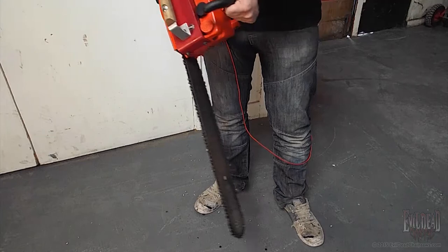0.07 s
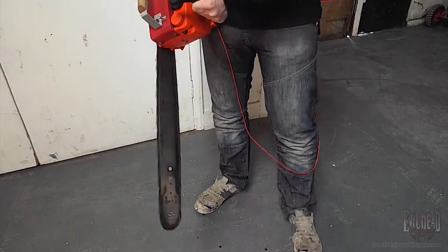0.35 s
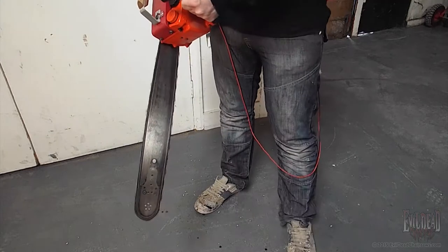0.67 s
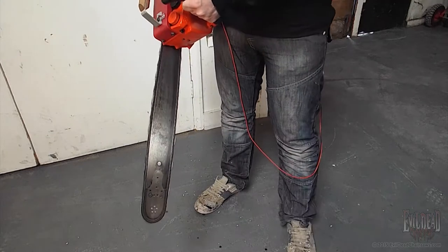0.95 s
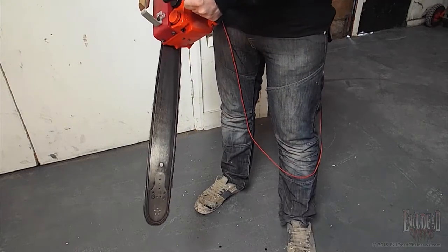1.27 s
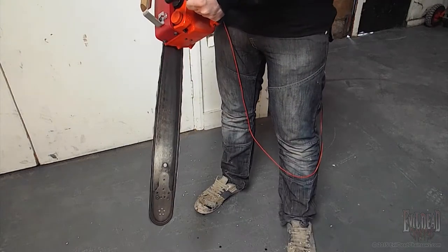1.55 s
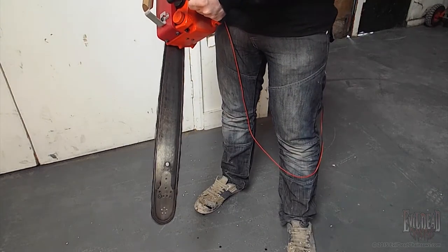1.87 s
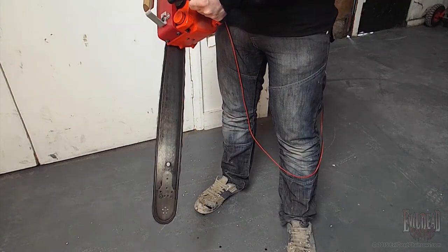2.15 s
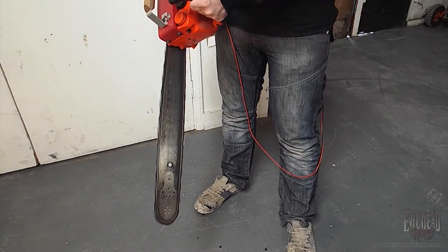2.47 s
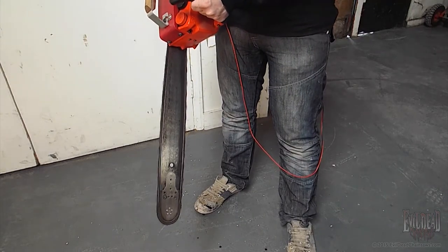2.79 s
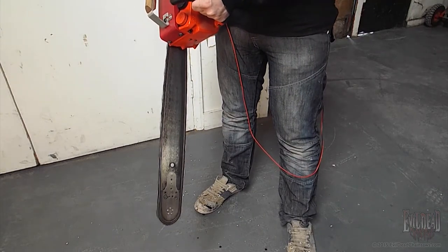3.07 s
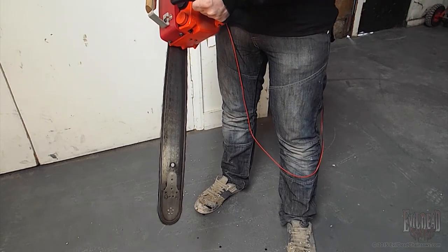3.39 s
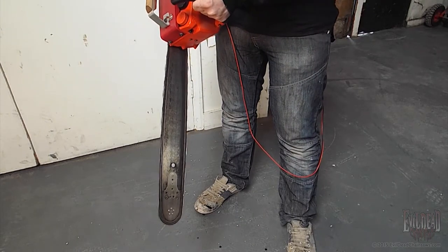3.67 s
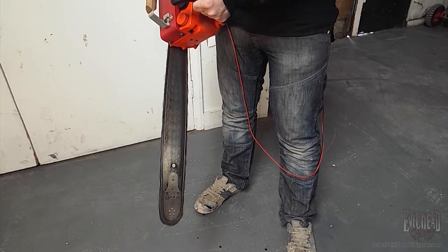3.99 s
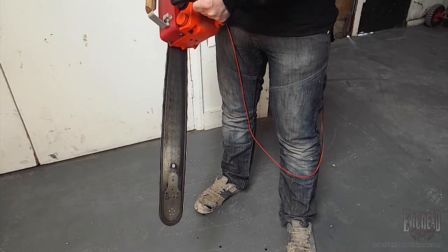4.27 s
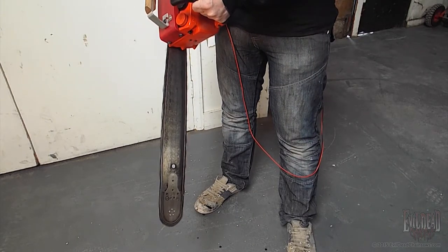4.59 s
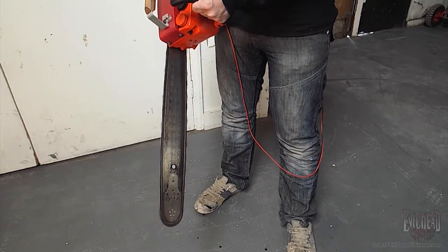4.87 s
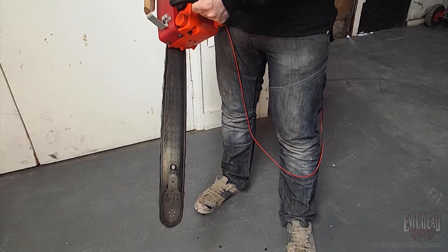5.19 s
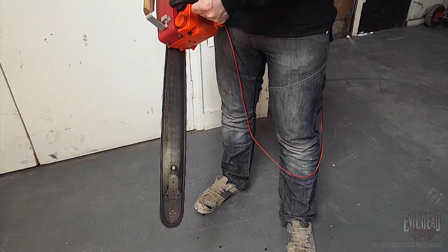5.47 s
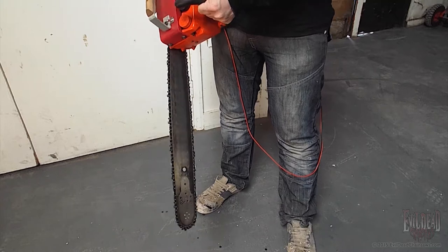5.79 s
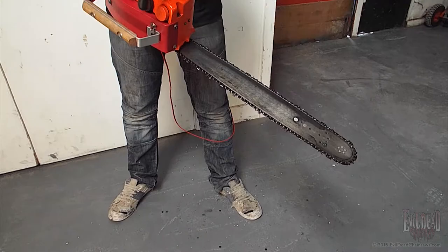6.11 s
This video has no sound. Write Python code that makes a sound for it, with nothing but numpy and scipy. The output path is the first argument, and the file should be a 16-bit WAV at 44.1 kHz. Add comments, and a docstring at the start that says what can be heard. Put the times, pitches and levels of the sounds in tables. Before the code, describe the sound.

A faint workshop hiss with a low-level hum opens the sound. At about 0.2 seconds an electric chainsaw switches on with a sharp slap of steel and reaches full speed almost at once. Its slack chain runs freely, cutting nothing, in a steady, growling rattle that throbs rapidly. Links knock inside the hollow plastic housing and tick and jingle brightly along the steel bar. Harder metallic slaps come irregularly, the strongest near 3.5, 4.6 and 5.3 seconds, and the housing sometimes rings out with a brief hollow tone. At about 5.6 seconds the power cuts and the chain coasts quickly to rest, settling with a dull shake around 5.8 seconds. Just after 6 seconds the saw is moved, giving a faint rustle and a thin, high squeak. The saw is close, with a short reverb from the floor and walls.

```python
"""In a quiet workshop an electric chainsaw is switched on with a slap of steel and spins up.
For five seconds its slack chain runs free: links knock in the hollow plastic housing and tick along
the steel bar, in a rattle that throbs 17 times a second and growls at the drive sprocket's six teeth.
Now and then a link slaps the bar hard, or the housing sings out. Then the chain coasts to rest
and settles, and at the end the saw is moved, with a rustle and a thin squeak."""
import sys
import numpy as np
from scipy import signal
from scipy.fft import rfft, irfft, next_fast_len
from scipy.io import wavfile
from scipy.ndimage import uniform_filter1d

SR = 44100
rng = np.random.default_rng(int(sys.argv[2]) if len(sys.argv) > 2 else 0)


def dump(signal):
    """Clip the signal to [-1, 1] and save it as 16-bit WAV at the path in sys.argv[1]."""
    limited = np.clip(np.atleast_2d(signal).T, -1, 1)
    pcm = np.round(limited * 32767).astype(np.int16)
    wavfile.write(sys.argv[1], SR, pcm)


N = 270774
T = np.arange(N) / SR
ON_S, OFF_S = 0.23, 5.554  # trigger pressed and released


def saw():
    """The main voice: running chain, slaps and shakes ring the plastic housing and the steel bar."""
    knocks, ticks = chain()
    shake_knocks, shake_ticks = shakes()
    return housing(knocks + shake_knocks) + bar(ticks + shake_ticks + slaps())


def chain(throb_hz=16.97, warming_hz_per_s=0.1, tightest_s=0.521, loosen_s=0.4):
    """Knocks for the housing, ticks for the bar; tension swings once a turn and jerks at every tooth."""
    speed = motor()
    turns = np.cumsum(speed * (throb_hz + warming_hz_per_s * T)) / SR  # a warm motor runs faster
    tension = np.cos(2 * np.pi * (turns - np.interp(tightest_s, T, turns)))
    blows, grip = sprocket(turns)
    flap_db = 0.62 * wander(top_hz=50.7)  # the slack chain flaps unevenly,
    scrape_db = 0.41 * wander(top_hz=8.2)  # rides harder or softer in the groove
    churn_db = 0.45 * wander(top_hz=0.8)  # and churns slowly in the housing
    plastic = impacts(per_s=3400 * speed, spread_db=0.5) * from_db(-30.5 + grip)
    knocks = (plastic + from_db(-39.5) * blows) * from_db(flap_db + churn_db + 0.5 * tension)
    steel = impacts(per_s=15000 * speed, spread_db=3.5) + jingle(speed)
    tight_db = -np.exp(-np.maximum(T - ON_S, 0) / loosen_s)  # quieter until the chain works loose
    ticks = steel * from_db(-30 + tight_db + flap_db + scrape_db + 1.03 * tension + 2 * grip)
    return knocks * speed ** 0.39, soften(ticks, speed) * speed ** 0.44  # faster links strike harder


def motor(spin_up_s=0.051, coast_s=0.108, friction=0.06):
    """Speed from 0 to 1: a quick spin-up, a steady run, and a coast until dry friction stops the chain."""
    spin_up = 1 - np.exp(-np.maximum(T - ON_S, 0) / spin_up_s)
    coast = (1 + friction) * np.exp(-np.maximum(T - OFF_S, 0) / coast_s) - friction
    return spin_up * np.maximum(coast, 0)


def sprocket(turns, teeth=6, slack_links=0.035, uneven_db=3, grip_links=0.11, bite_s=0.0012):
    """The growl: each tooth catches a slack link a little early or late, with a blow and a brief grip."""
    links = teeth * turns + slack_links * wander(top_hz=25.2) * motor()
    links_caught = np.floor(np.maximum.accumulate(links))
    catches = np.diff(links_caught, prepend=links_caught[0])
    blows = catches * from_db(uneven_db * np.clip(rng.standard_normal(N), -2, 1.5))
    grip = uniform_filter1d(np.exp(-(links % 1) / grip_links), round(bite_s * SR))
    return unit(blows) * [[1], [0]], grip  # the blows feed the mid only


def jingle(speed, band_db=-10, clump_db=2):
    """Loose links jingle in clumps, now in a lower band and now in a higher one."""
    out = np.zeros((2, N))
    for band_hz in [(4200, 6800), (6800, 10500)]:
        hits = impacts(per_s=4000 * speed, spread_db=3.5)
        clumps = from_db(clump_db * np.minimum(wander(top_hz=25.7), 2))
        bandpass = signal.butter(2, band_hz, "bandpass", fs=SR, output="sos")
        out += from_db(band_db) * unit(signal.sosfilt(bandpass, hits * clumps))
    return out


def soften(ticks, speed, corner_hz=6000):
    """Slow links meet the bar more gently: their top end fades with the speed."""
    dull = signal.lfilter(*signal.butter(1, corner_hz, fs=SR), ticks)
    return dull + (ticks - dull) * speed ** 0.36


# The housing's boxy tone curve: f/Hz, level/dB
HOUSING_CURVE = [(100, -47.5), (190, -60), (255, -33), (300, -20), (410, -17.5), (460, -8.5), (505, -1),
                 (600, -4), (700, -5), (1050, -4), (1350, -12.5), (2000, -16.5), (4000, -33.5), (9000, -75)]
# Its resonant peaks and dips: f/Hz, width/Hz, level/dB over the curve
HOUSING_RESONANCES = [(308, 16, 2), (392, 26, 3), (453, 14, 6), (496, 24, 2.5), (525, 22, 4.8),
                      (571, 16, 7.8), (627, 16, 9), (653, 14, 5.5), (690, 34, -2.5), (736, 14, 2.5),
                      (772, 26, 4.5), (815, 14, 5), (885, 22, -2.5), (934, 22, 6.8), (1042, 22, 3),
                      (1088, 14, 2.5), (1131, 18, 3.5), (1260, 36, -3), (1334, 36, 4), (1400, 60, -3.5)]
# Swells of a single resonance: t/s, length/s, f/Hz, boost/dB
HOUSING_SWELLS = [(0.75, 0.75, 1040, 4.5), (2.72, 0.32, 930, 6), (2.93, 0.24, 620, 5.5),
                  (3.8, 0.51, 620, 2), (3.85, 2.2, 945, 3), (5.132, 0.62, 579, 5)]


def housing(knocks, width_hz=20):
    """The body of the sound: hollow plastic rings, and now and then one resonance sings out."""
    out = convolve(knocks, ring(HOUSING_CURVE, HOUSING_RESONANCES))
    for start, length, hz, boost_db in HOUSING_SWELLS:
        resonance = signal.lfilter(*signal.iirpeak(hz, hz / width_hz, fs=SR), out)
        out = out + (from_db(boost_db) - 1) * burst(start, length) * resonance
    return out


# The bar's bright tone curve: f/Hz, level/dB
BAR_CURVE = [(300, -46), (800, -17.5), (1500, -2.5), (2200, -0.5), (2800, -0.5), (3400, 2), (4200, -1),
             (5200, 0.5), (7000, 0.5), (8300, 1.5), (9500, -2), (11500, -7), (13000, -12.5), (15800, -19.5)]
# Its metallic peaks: f/Hz, width/Hz, level/dB over the curve
BAR_RESONANCES = [(1574, 190, 8.2), (1905, 105, 5.7), (2216, 29, 3.4), (2410, 170, 5.2), (3157, 156, 5.7),
                  (4540, 170, 1.9), (5380, 110, 2.4), (5550, 200, 2.9), (6150, 150, 4.5), (7860, 100, 2),
                  (9060, 110, 3.6), (9540, 150, 2.4)]


def bar(ticks, echoes=14, echo_db=-13):
    """The bright edge: the steel bar rings, and nearby floor, wall and legs echo it within 25 ms."""
    steel = convolve(ticks, ring(BAR_CURVE, BAR_RESONANCES))
    taps = np.zeros(SR // 40)
    gains = rng.choice([-1, 1], echoes) * from_db(echo_db) / np.sqrt(echoes)
    taps[rng.integers(SR // 300, len(taps), echoes)] = gains
    return steel + convolve(steel, taps)


# Hard steel accents, the first at switch-on: t/s, level/dB into the bar, f/Hz, width/octaves, decay/s
LINK_SLAPS = [(0.2391, -18, 9800, 0.42, 0.001), (0.2487, -30, 9000, .35, .001),
              (0.820, -18.5, 5600, .4, .003), (0.932, -16, 5750, .5, .004), (1.041, -15, 5600, .45, 0.0032),
              (1.115, -19, 6000, .4, .003), (1.3515, -15, 5200, 0.49, .003),
              (1.5637, -20, 6230, 0.43, .003), (1.582, -16, 6100, 0.49, .003),
              (1.633, -16, 3900, .65, 0.0035), (1.688, -16, 7500, .45, .003),
              (1.807, -19.5, 5360, .45, 0.0041), (2.164, -15, 11000, 0.47, .003),
              (2.3403, -15, 4500, .5, .003), (2.392, -19, 5400, .45, .003), (2.5725, -16, 8200, 0.22, .003),
              (2.972, -24, 4000, 0.45, .003), (3.079, -15, 4700, .45, .003), (3.318, -22, 6400, 0.37, .004),
              (3.5358, -9, 11500, 0.55, .002), (3.5412, -15, 11000, .6, .003),
              (3.608, -12, 5000, .4, .0028), (3.710, -22, 3200, 0.49, .006), (3.723, -14, 4700, 0.36, .003),
              (3.877, -17, 7800, 0.25, .0024), (4.300, -19, 4900, .45, .005), (4.3625, -15, 5500, .4, .003),
              (4.6268, -9, 6900, .45, .0026), (4.6317, -7.8, 6200, 0.58, .0017),
              (4.928, -21, 6100, .45, .004), (4.936, -18.5, 5400, .4, .003),
              (4.988, -16, 5200, 0.36, 0.0076), (5.046, -16, 4800, .42, 0.0056),
              (5.094, -13, 3770, .45, 0.0027), (5.165, -16, 5550, .45, 0.0044),
              (5.276, -19.5, 5450, .4, .004), (5.3082, -11.5, 5700, .48, 0.0041)]


def slaps(attack_s=0.0006, size=2048):
    """A link strikes the bar and chatters for a few milliseconds, in a band set by where it lands."""
    force = np.zeros((2, N))
    hz, t = np.fft.rfftfreq(size, 1 / SR), T[:size]
    for start, db, centre_hz, octaves, decay_s in LINK_SLAPS:
        band = np.exp(-0.5 * (np.log2((hz + 1) / centre_hz) / octaves) ** 2)
        phases = np.exp(2j * np.pi * rng.random((2, len(hz))))
        chatter = irfft(phases * band) * np.sqrt(size)
        envelope = np.minimum(t / attack_s, 1) * np.exp(-t / decay_s)
        force[:, round(start * SR):][:, :size] += from_db(db) * chatter * envelope
    return force


# Closing rustles: t/s, length/s, level/dB into the housing, level/dB into the bar, bar low-pass f/Hz
SOFT_SHAKES = [(5.761, 0.02, -51, -27.5, 1700), (6.058, 0.089, -49.5, -45.5, 3600)]


def shakes():
    """The whole saw shakes as the chain settles and again as it is moved; soft contact sounds dull."""
    knocks, ticks = np.zeros((2, 2, N))
    for start, length, housing_db, bar_db, cutoff_hz in SOFT_SHAKES:
        rattle = burst(start, length) * impacts(per_s=12000, spread_db=4)
        knocks += from_db(housing_db) * rattle
        ticks += from_db(bar_db) * signal.lfilter(*signal.butter(3, cutoff_hz, fs=SR), rattle)
    return knocks, ticks


# Four hoots and the last squeak: t/s, length/s, f/Hz, level/dB, waver/share of the pitch
HOOTS_AND_SQUEAK = [(0.278, 0.024, 533, -27, 0.028), (3.042, 0.05, 620, -29, 0.022),
                    (5.491, 0.03, 575, -28.5, 0.025), (5.578, 0.024, 562, -31, 0.021),
                    (6.074, 0.076, 8390, -55, .007)]


def hoots_and_squeak():
    """The housing hoots as the chain runs and the saw squeaks when moved: brief, wavering tones."""
    out = np.zeros((2, N))
    for start, length, hz, db, waver in HOOTS_AND_SQUEAK:
        pitch_hz = hz * (1 + waver * wander(top_hz=150))
        phase = 2 * np.pi * np.cumsum(pitch_hz) / SR
        tone = unit(np.array([np.sin(phase), np.cos(phase)]))
        out += from_db(db) * burst(start, length) * tone
    return out


def workshop(direct, wet_db=-10.5, low_t60_s=0.94, high_t60_s=0.55, crossfade_hz=0.4525, tails=4):
    """Floor and wall reverb, highs dying first; several tails slowly crossfade to keep its tone even."""
    out = direct
    for k in range(tails):
        hz, t, noise = signal.stft(rng.standard_normal((2, SR // 2)), SR, nperseg=256)
        t60 = over_hz([(500, low_t60_s), (9000, high_t60_s)], hz)[:, None]
        decay = np.exp(-np.log(1000) * t / t60) * (t > 0.004)  # with a short pre-delay
        tail = signal.istft(noise * decay, SR)[1]
        crossfade = 2 * np.pi * crossfade_hz * (1 + k // 2) * T + k * np.pi / 2
        send = np.sqrt(2 / tails) * np.cos(crossfade)  # the total power stays constant
        out = out + from_db(wet_db) * convolve(direct * send, tail / np.linalg.norm(tail[0]))
    return out


# The tone curve of the quiet workshop: f/Hz, level/dB
ROOM_CURVE = [(20, -12), (60, -14.5), (110, -13.5), (170, -11), (400, -3.5), (700, -7), (1300, -2),
              (3000, -9), (4000, -10), (6500, -14.5), (7900, -8), (10000, -13.5), (12500, -17),
              (15800, -18.5)]
# Its hums and whine: f/Hz, width/Hz, level/dB over the curve
ROOM_HUMS = [(168.7, 17, 10.5), (214, 18, 3.5), (558, 14, 14), (678, 22, 18), (1130, 60, 2), (2470, 120, 7),
             (3030, 80, 11), (7900, 200, 3.5), (8420, 160, 4.5), (11719, 40, 17)]


def room_tone(level_db=-54, start_s=0.105, fade_s=0.006):
    """The bed under it all: a steady hiss with faint hums and a thin whine."""
    fade_in = np.clip((T - start_s) / fade_s, 0, 1)
    hiss = convolve(rng.standard_normal((2, N)), ring(ROOM_CURVE, ROOM_HUMS))
    return from_db(level_db) * hiss * fade_in


def impacts(per_s, spread_db):
    """Random hits of uneven size, each from its own direction: rows mid and side, each of rms 1."""
    size, direction = rng.standard_normal((2, N))
    strikes = (rng.random(N) < per_s / SR) * rng.choice([-1, 1], N)
    hits = strikes * from_db(spread_db * np.clip(size, -2, 2))
    return np.array([unit(hits), unit(hits * np.tanh(direction))])


def ring(curve, resonances, size=16384):
    """Impulse response, of energy 1, of a body with a tone curve and resonances."""
    hz = abs(np.fft.fftfreq(size, 1 / SR))
    peaks_db = sum(db / (1 + (2 * (hz - f) / width) ** 2) for f, width, db in resonances)
    log_gain = np.log(from_db(over_hz(curve, hz) + peaks_db))
    minimum_phase = np.exp(np.conj(signal.hilbert(log_gain)))
    response = np.fft.ifft(minimum_phase).real[:size // 2]
    return response / np.linalg.norm(response)


def wander(top_hz):
    """Random modulation of rms 1, cut below 2 Hz and rolled off above top_hz."""
    hz = np.fft.rfftfreq(N, 1 / SR)
    return unit(irfft(rfft(rng.standard_normal(N)) * (hz > 2) / (1 + (hz / top_hz) ** 2), N))


def burst(start_s, length_s):
    """An envelope with a rounded rise, a hold and a rounded fall."""
    return np.tanh(2 * np.sin(np.pi * np.clip((T - start_s) / length_s, 0, 1)) ** 2)


def convolve(x, response):
    """Passes both channels through an impulse response."""
    return signal.oaconvolve(x, np.atleast_2d(response), axes=1)[:, :N]


def over_hz(points, hz):
    """Reads a curve on a log-frequency axis."""
    f, value = np.transpose(points)
    return np.interp(np.log(hz + 1), np.log(f + 1), value)


def from_db(db):
    """Decibels to gain."""
    return 10 ** (np.asarray(db) / 20)


def unit(x):
    """Scales to an rms of 1."""
    return x / np.sqrt(np.mean(x ** 2) + 1e-20)


# Stereo width: f/Hz, level/dB of side over mid
STEREO_WIDTH = [(30, -28), (130, -20), (330, -29), (700, -14.5), (1400, -10), (2600, -5), (6000, -4),
                (15000, -5.5)]
# Stereo lean: f/Hz, level/dB of left over right
STEREO_BALANCE = [(100, -1), (300, 2.5), (600, 0), (1400, 0), (2800, -0.9), (4500, -2.5), (6000, -3.5),
                  (8400, -4), (10000, 0.3)]


def scene():
    """The mix: the saw in its workshop over the room tone, narrow in the bass and wide in the treble."""
    mix = workshop(saw() + hoots_and_squeak()) + room_tone()
    size = next_fast_len(N + SR)
    hz = np.fft.rfftfreq(size, 1 / SR)
    mid, side = rfft(mix, size)
    side = side * from_db(over_hz(STEREO_WIDTH, hz))
    lean = from_db(over_hz(STEREO_BALANCE, hz) / 2)
    left, right = (mid + side) * lean, (mid - side) / lean
    return irfft(np.array([left, right]), size)[:, :N]


def record(dry):
    """A steep high cut at 15850 Hz."""
    lowpass = signal.firwin(601, 15850, window=("kaiser", 8), fs=SR)
    return signal.oaconvolve(dry, lowpass[None], "same", axes=1)


dry = scene()
out = record(dry)
dump(out)
```